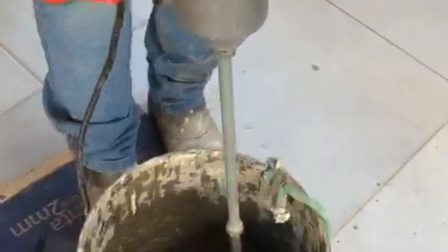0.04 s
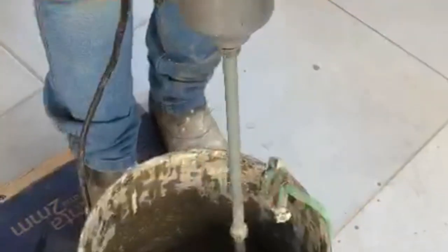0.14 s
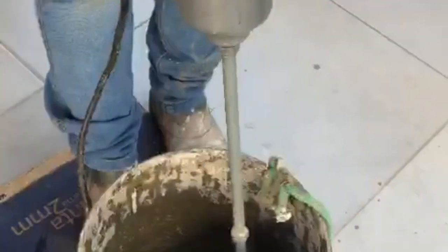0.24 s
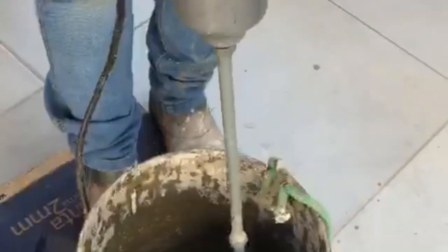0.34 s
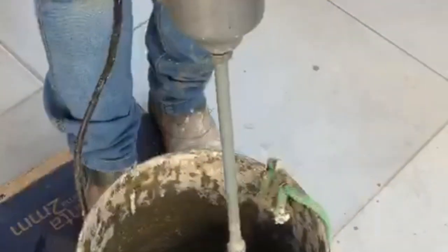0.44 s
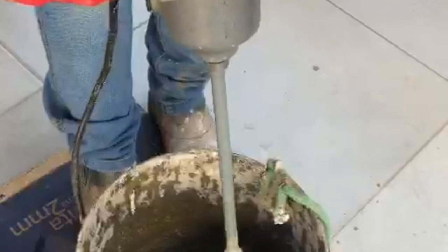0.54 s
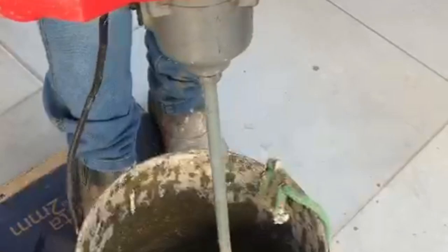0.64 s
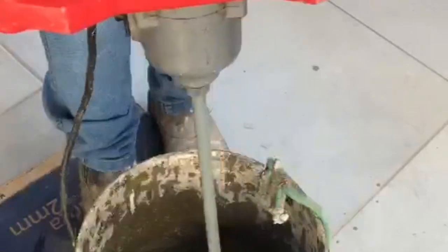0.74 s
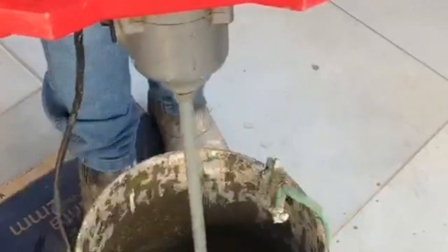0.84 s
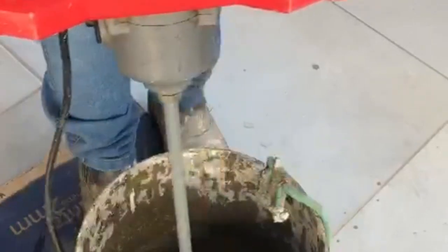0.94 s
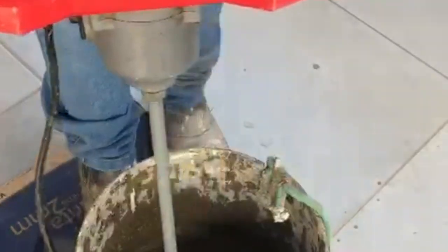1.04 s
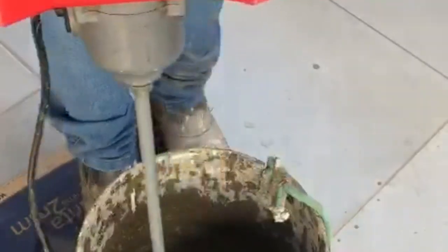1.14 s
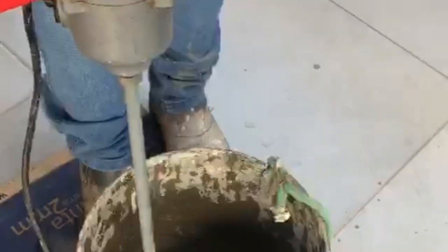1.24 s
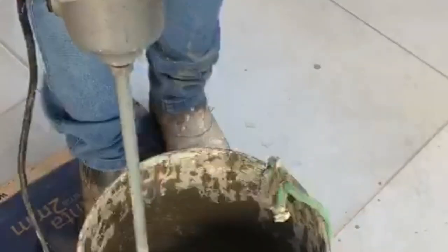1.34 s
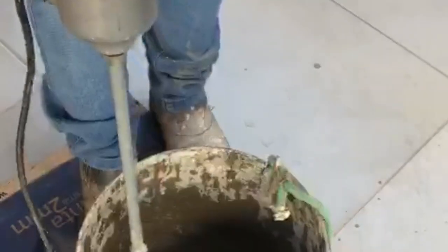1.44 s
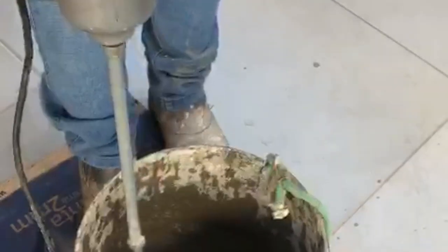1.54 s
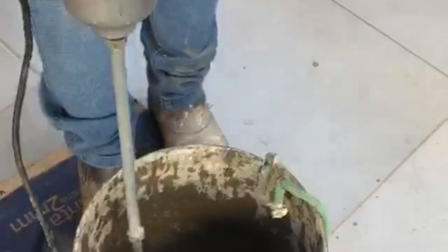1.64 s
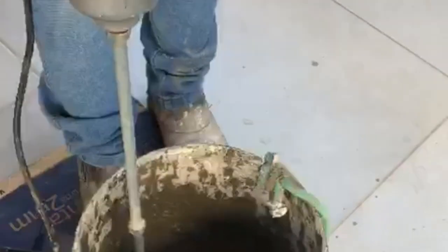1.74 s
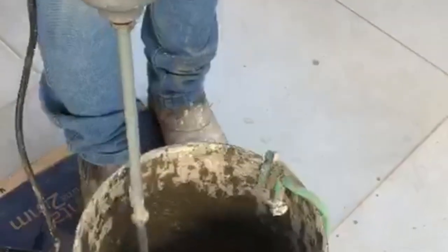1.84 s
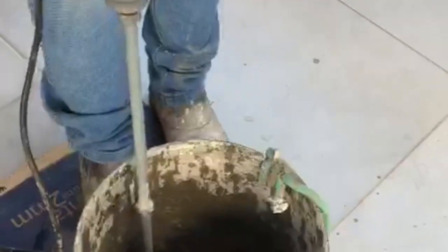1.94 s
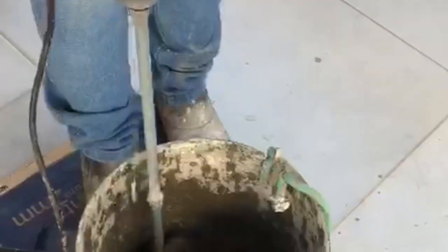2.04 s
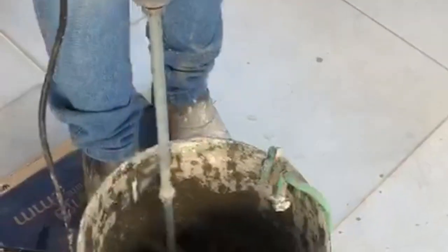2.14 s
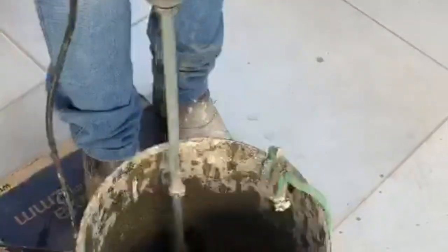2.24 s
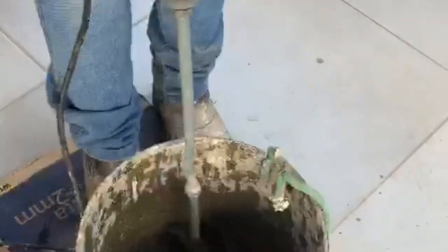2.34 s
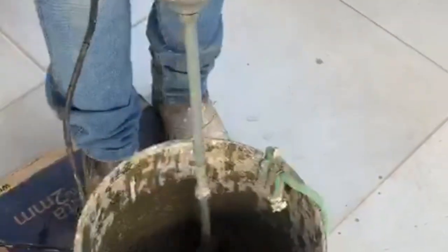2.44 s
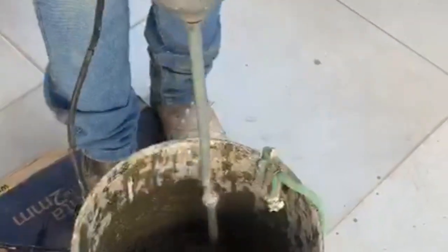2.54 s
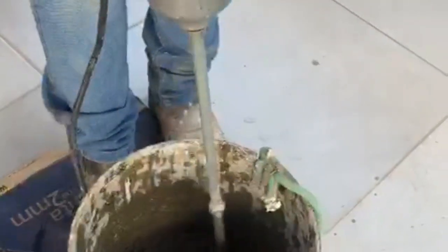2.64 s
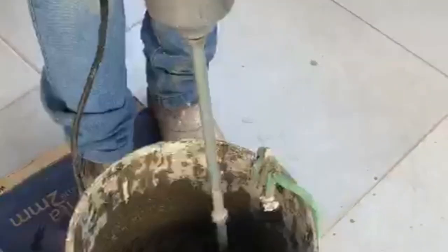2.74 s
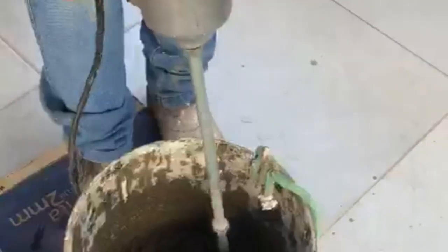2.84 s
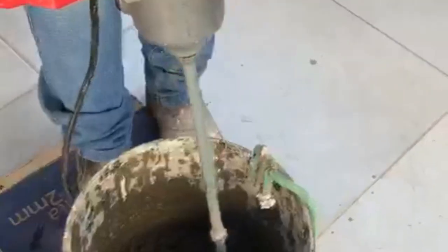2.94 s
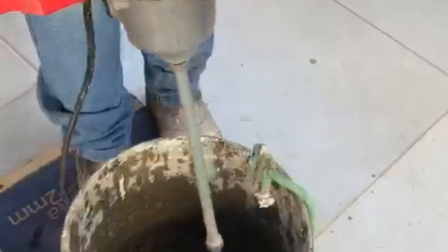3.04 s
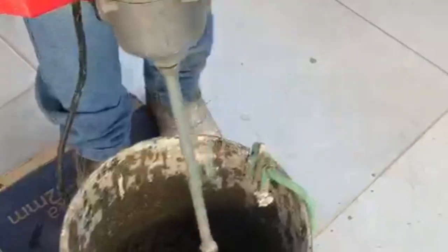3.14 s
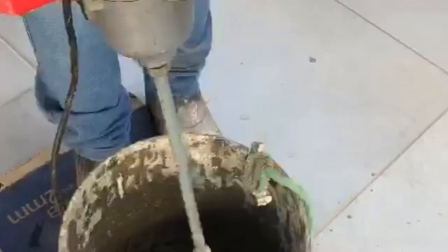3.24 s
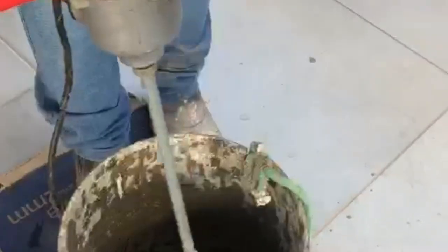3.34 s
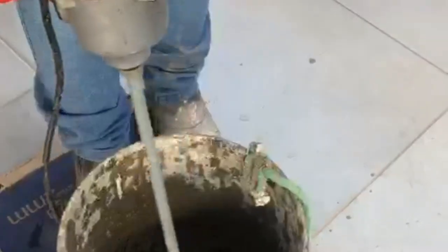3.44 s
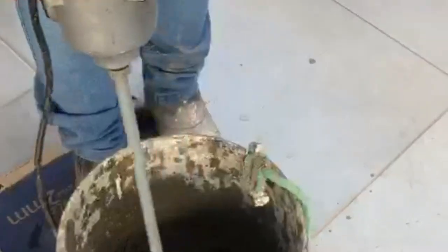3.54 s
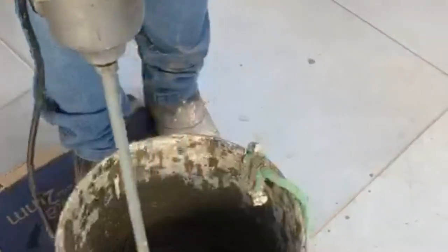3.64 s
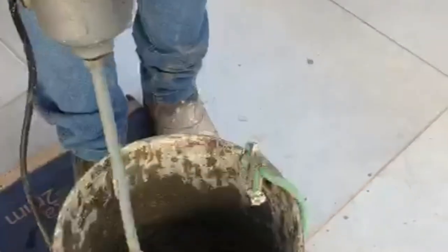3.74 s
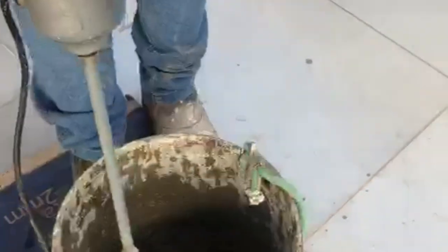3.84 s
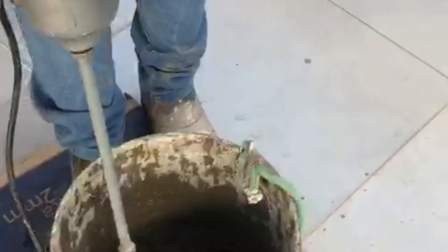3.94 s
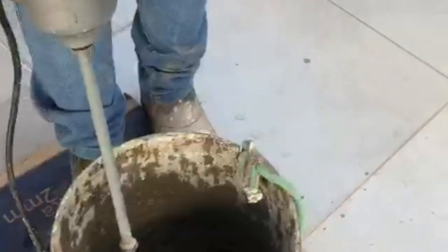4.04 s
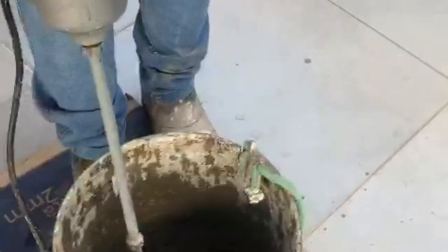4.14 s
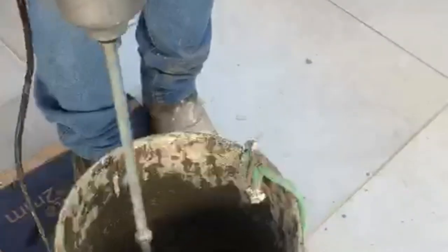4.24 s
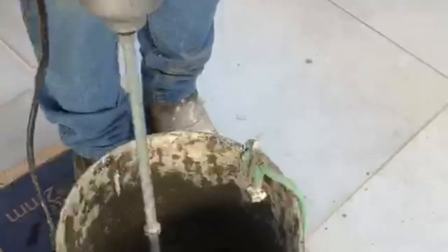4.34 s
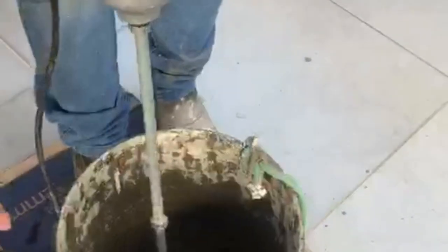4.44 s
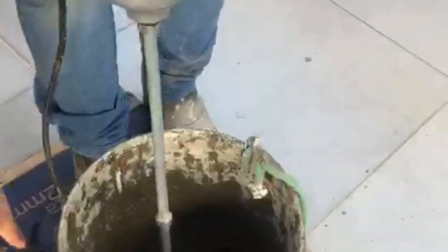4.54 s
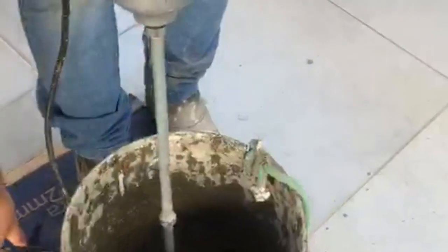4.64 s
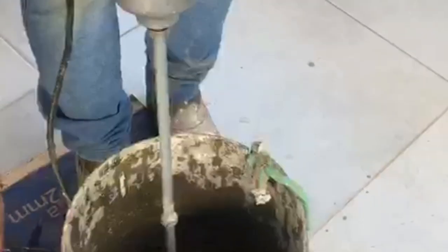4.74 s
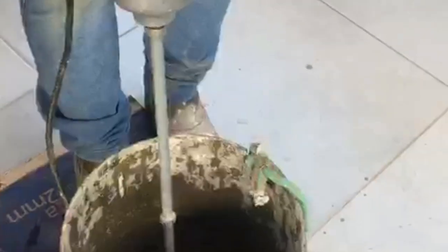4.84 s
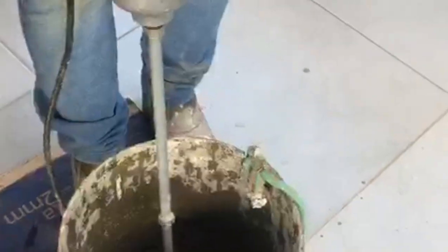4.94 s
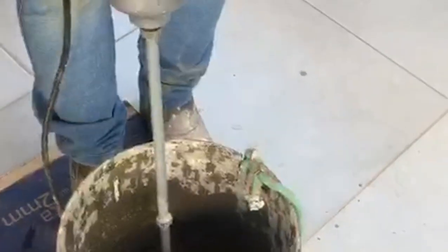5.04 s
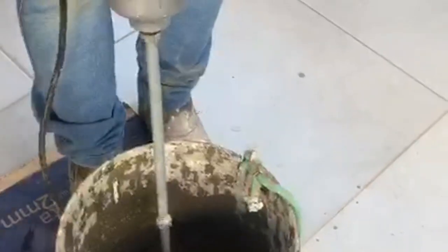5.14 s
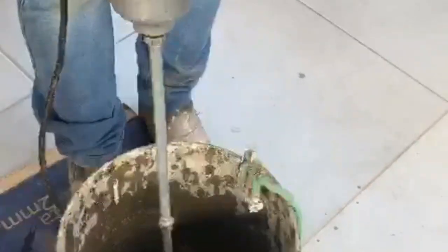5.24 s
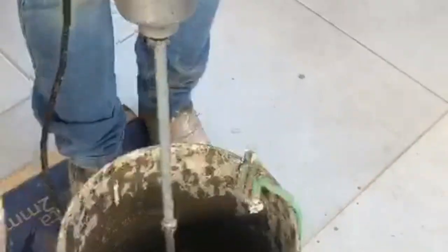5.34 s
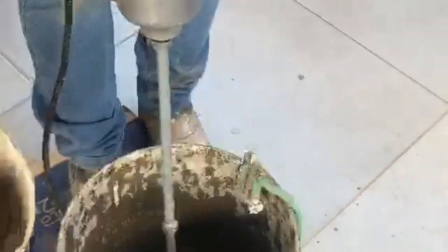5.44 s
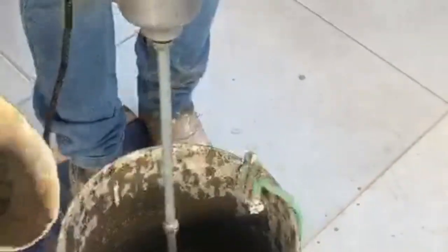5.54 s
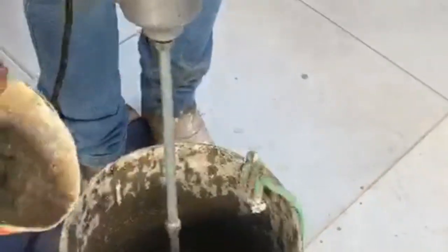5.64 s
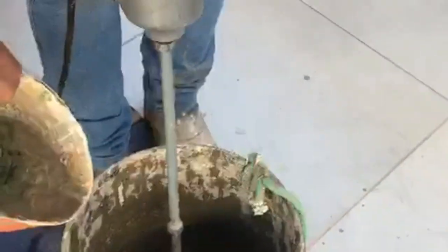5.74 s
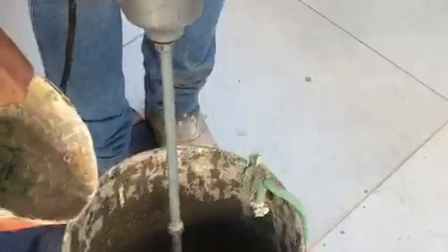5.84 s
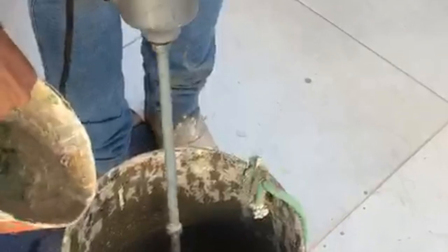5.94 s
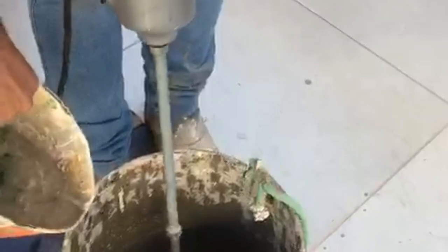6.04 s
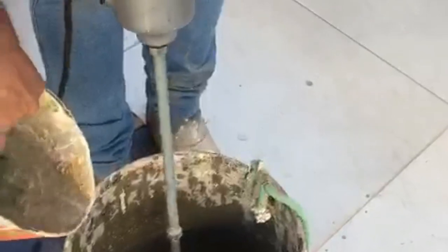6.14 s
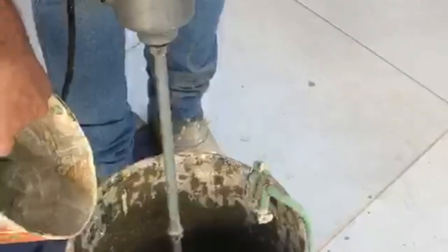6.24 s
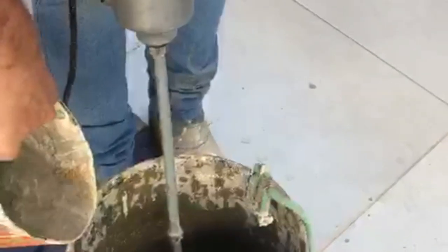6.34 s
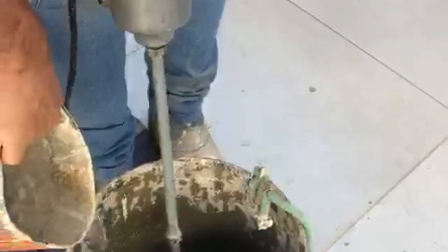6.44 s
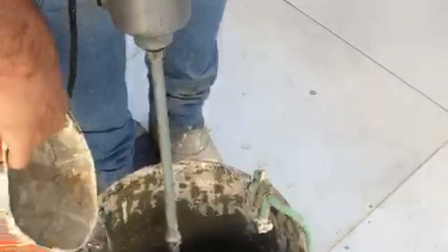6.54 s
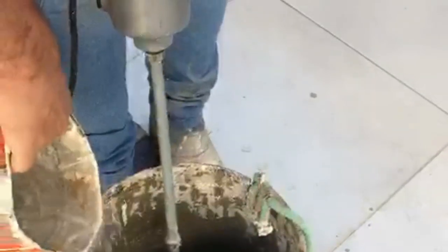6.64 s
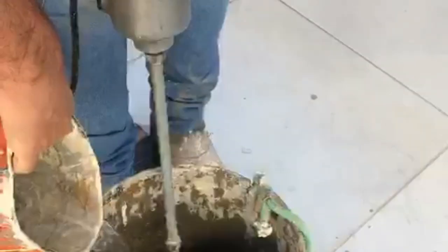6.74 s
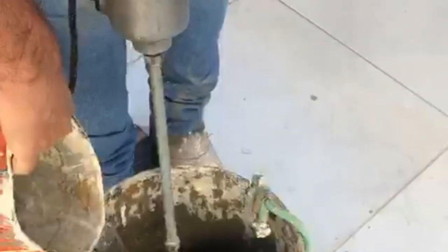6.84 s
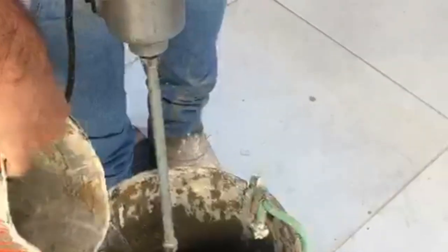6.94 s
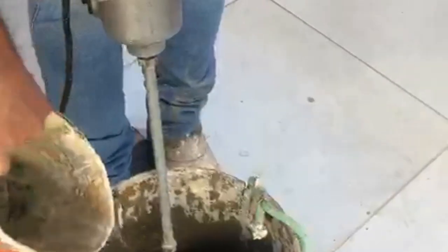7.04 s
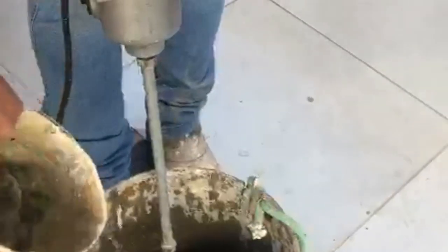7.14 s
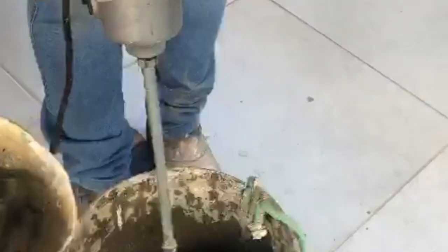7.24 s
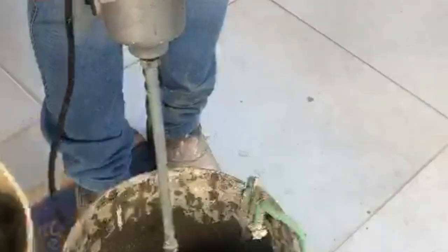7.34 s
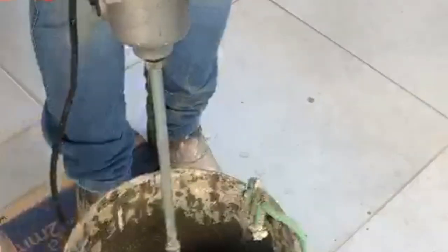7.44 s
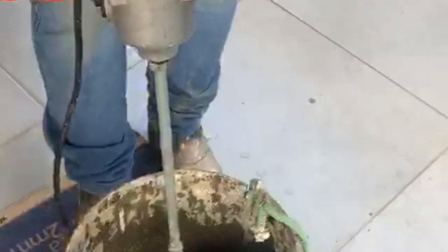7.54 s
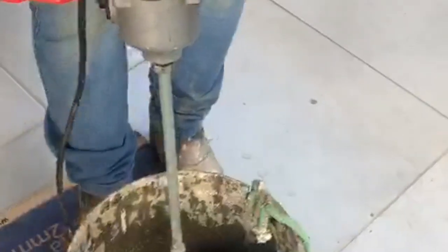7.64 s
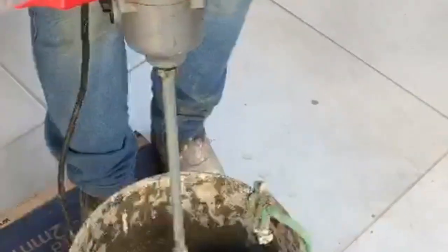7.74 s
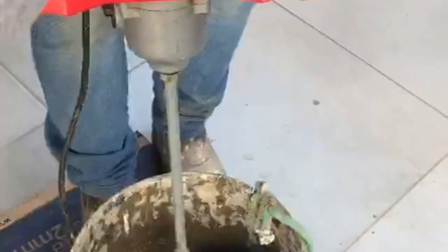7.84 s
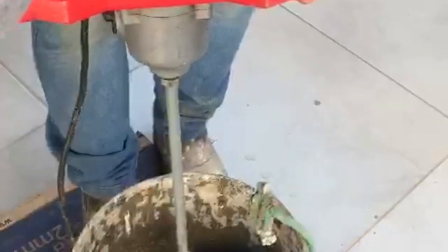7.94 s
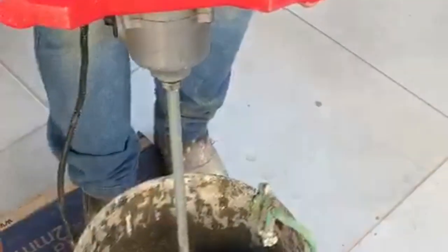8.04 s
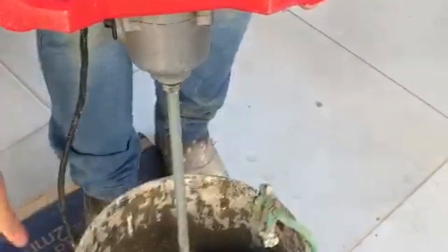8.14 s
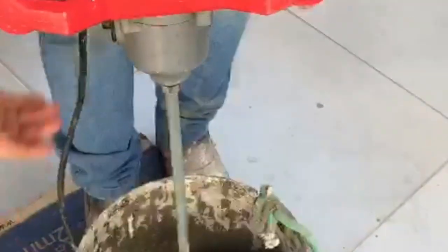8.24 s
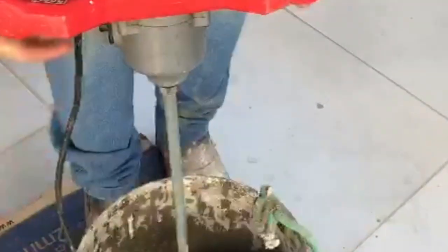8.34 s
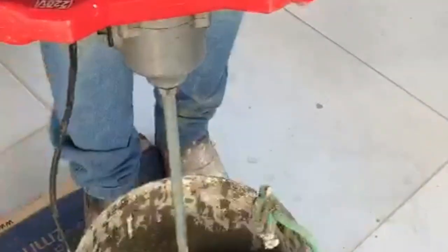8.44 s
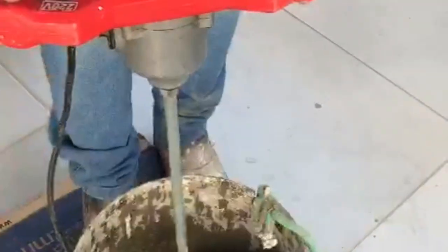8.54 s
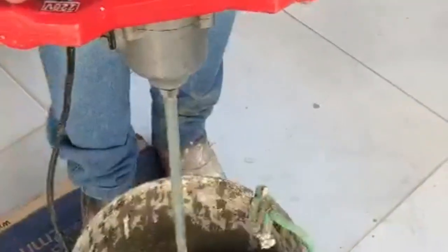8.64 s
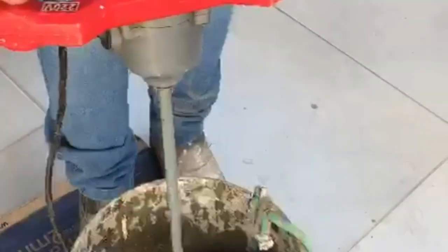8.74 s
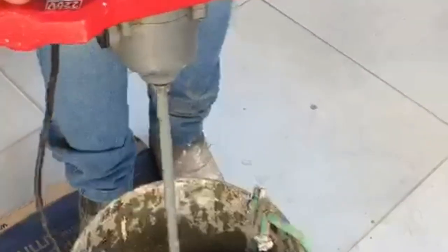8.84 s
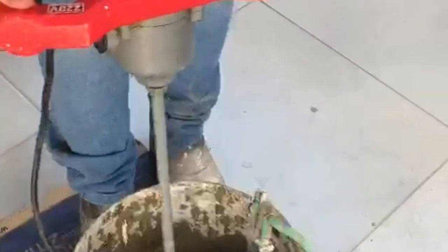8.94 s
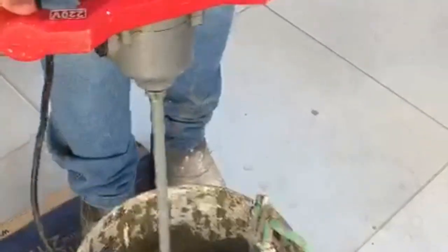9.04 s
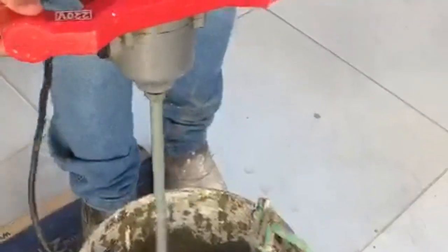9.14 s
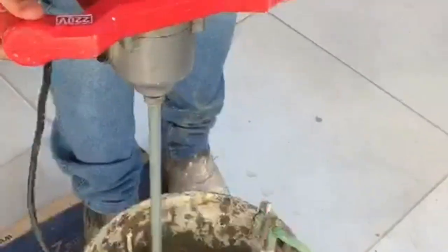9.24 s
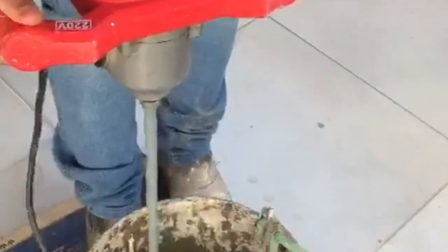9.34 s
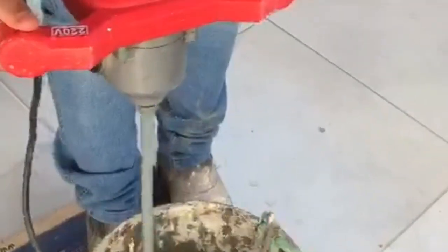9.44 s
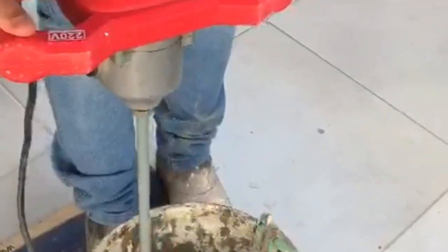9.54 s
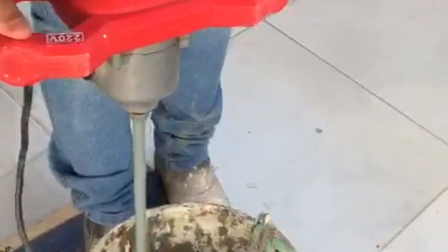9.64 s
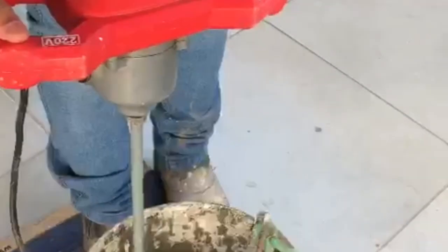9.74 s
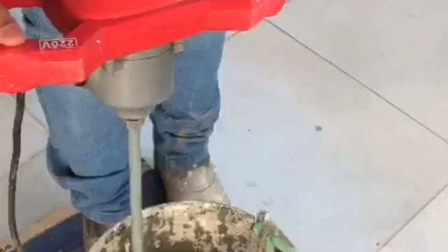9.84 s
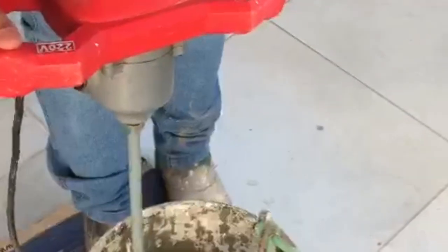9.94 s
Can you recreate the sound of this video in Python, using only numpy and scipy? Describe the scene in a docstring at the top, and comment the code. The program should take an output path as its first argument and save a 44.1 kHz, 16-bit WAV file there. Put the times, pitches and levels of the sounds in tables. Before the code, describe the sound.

Close up, an electric paddle mixer runs with a raspy whir and gear whine as it churns mortar. The motor cuts and the gears slow to a stop. Quiet trickling grit and small lumps drop into the bucket, followed by a light scraping knock from a pail and faint squeaks. Then a sharp click starts the mixer again, its whine rising quickly over a faint background rumble.

```python
"""Paddle mixer in a mortar bucket

A handheld electric mixer stirs mortar, coasts to a stop and is switched on again. One rotor speed
drives the gear whine, the motor's mains-pulsed growl and the rush of fan and gears.
In the pause grit is tipped in from a small pail, and the pail is set down."""
import sys
import numpy as np
from scipy import signal
from scipy.fft import rfft, irfft, next_fast_len
from scipy.io import wavfile
from scipy.ndimage import uniform_filter1d

SR = 44100
rng = np.random.default_rng(int(sys.argv[2]) if len(sys.argv) > 2 else 0)


def wav_out(sig):
    """Save sig, one row per channel (or a flat mono array), as 16-bit PCM at SR to the path in sys.argv[1]."""
    wavfile.write(sys.argv[1], SR, np.round(np.clip(np.atleast_2d(sig).T, -1, 1) * 32767).astype(np.int16))


N = 440559
TIME = np.arange(N) / SR
OFF_S, ON_S = 3.96, 8.722  # trigger released, pressed
LOOSEN_S = .8  # release to fully loose gears
MAINS_HZ, NO_LOAD_RPS, SLOT_COUNT = 60, 289, 12
RIPPLE_DB = 3.8

# bucket and motor housing resonances: f/Hz, width/Hz, lift/dB
HOUSING = [(420, 36, 7), (567, 66, -3), (880, 87, -2), (1095, 590, 5), (1642, 91, 8), (2024, 120, 5),
           (2446, 760, 6.5), (3500, 400, 3.5), (4400, 530, 5), (7040, 1060, 7.5), (10120, 820, 3.5)]
# gearbox casing resonances: f/Hz, width/Hz, lift/dB
CASING = [(1070, 220, 11), (1680, 150, 9.5), (1880, 410, 5.5), (2454, 230, 8.5), (3130, 170, 8),
          (3720, 330, 6.5), (4940, 90, -1), (7650, 420, 8), (10280, 470, 15)]


def amp(db):
    """dB to gain."""
    return 10 ** (np.asarray(db) / 20)


def unit(x):
    """Scale to rms 1."""
    return x / np.sqrt(np.mean(x ** 2) + 1e-20)


def curve(points):
    """(t/s, value) points to one value per sample."""
    return np.interp(TIME, *np.transpose(points))


def read(points, hz):
    """(f/Hz, value) points interpolated over log frequency."""
    f, value = np.transpose(points)
    return np.interp(np.log(hz + 1), np.log(f + 1), value)


def lift_db(resonances, hz):
    """Summed lift of resonance peaks at hz."""
    grid_hz = np.arange(0, 13000, 10)
    lift = sum(db / (1 + (2 * (grid_hz - f) / width) ** 2) for f, width, db in resonances)
    return np.interp(hz, grid_hz, lift)


def filtered(x, gain):
    """FFT filter by gain(f/Hz)."""
    size = next_fast_len(len(x))
    return irfft(rfft(x, size) * gain(np.fft.rfftfreq(size, 1 / SR)), size)[:len(x)]


def coloured(x, spectrum):
    """Shape by (f/Hz, level/dB) points; rms 1."""
    return unit(filtered(x, lambda f: amp(read(spectrum, f))))


def band(x, hz, octaves):
    """Band-pass, Gaussian over log frequency."""
    return filtered(x, lambda f: np.exp(-.5 * (np.log2((f + 1) / hz) / octaves) ** 2))


def drift(hz):
    """Random wander, rms 1, hz new values a second."""
    knots = rng.standard_normal(40000)
    return unit(np.interp(TIME * hz, np.arange(len(knots)), knots))


def swell(middle_s, length_s):
    """Soft-edged window, peak 1."""
    return np.exp(-(2 * (TIME - middle_s) / length_s) ** 4)


def add(mix, start_s, sound):
    """Mix a sound in, in place."""
    part = mix[round(start_s * SR):][:len(sound)]
    part += sound[:len(part)]


def burst(t60_s):
    """Decaying noise puff."""
    t = TIME[:SR // 4]
    return rng.standard_normal(len(t)) * amp(-60 * t / t60_s)


def impacts(rows, octaves):
    """Small impacts, each a puff around its own pitch."""
    out = np.zeros(N)
    for start_s, db, hz, t60_s in rows:
        puff = burst(t60_s)
        hit = band(puff, hz, octaves)
        add(out, start_s, amp(db) * hit * np.std(puff) / np.std(hit))
    return out


def rotor_rps(coast_s=2.1975, drag_rps=299, restart_rps=269.2):
    """Turns per second: loaded by mortar, braked by friction and fan drag, at rest, climbing again."""
    # stirring: t/s, speed/rps
    stir = [(0.0, 269.5), (0.51, 285.8), (0.73, 287.8), (1.45, 288.5), (2.25, 285.0), (3.12, 279.6),
            (3.34, 279.7), (3.96, 284.4)]
    # quick and slow part of the climb: share, time constant/s
    lags = [(.7325, .225), (.2675, .769)]
    left = np.clip(1 - (TIME - OFF_S) / coast_s, 0, 1)
    coast = drag_rps * np.tan(np.arctan(stir[-1][1] / drag_rps) * left)  # drag = friction at drag_rps
    on_s = np.maximum(TIME - ON_S, 0)
    climb = restart_rps * sum(share * (1 - np.exp(-on_s / lag_s)) for share, lag_s in lags)
    return np.where(TIME < OFF_S, curve(stir), coast + climb)


def halvings(rps):
    """Octaves below no-load speed."""
    return -np.log2(rps / NO_LOAD_RPS + 1e-9)


def current(rps):
    """Share of stall current: a slower rotor draws more."""
    return np.sqrt(np.maximum(1 - rps / NO_LOAD_RPS, 0))


def freewheel(release_s):
    """0 under power, ramping to 1 after trigger release."""
    return np.clip((TIME - OFF_S) / release_s, 0, 1) * (TIME < ON_S)


def tone(turns, order, waver_db, blur_rad):
    """One multiple of rotor speed; swells and smears as the tool sways."""
    sway = amp(waver_db * drift(14) - waver_db ** 2 / 10)
    phase = 2 * np.pi * (order * turns + rng.random()) + blur_rad * drift(40)
    return np.sqrt(2) * sway * np.cos(phase)


def ripple(hz, depth_db):
    """Gain through the casing's fine resonances, which break up a gliding tone."""
    modes = rng.standard_normal(400)
    return amp(depth_db * np.interp(hz / 80, np.arange(len(modes)), modes) - depth_db ** 2 / 14)


def reflected(x, delays_ms=(4.3, 9.1, 15.7, 23.3)):
    """Echoes off floor, legs and bucket make a gliding tone flicker."""
    echoes = sum(np.pad(x, (int(ms * SR / 1000), 0))[:N] for ms in delays_ms)
    return .92 * (x + .22 * echoes)


def room(x):
    """Diffuse tail; treble dies first."""
    # decay: f/Hz, t60/s
    decay = [(200, 0.98), (1500, 0.54), (5000, 0.21), (12000, 0.31)]
    hz, t, spectra = signal.stft(rng.standard_normal(SR) * (TIME[:SR] > .006), SR, nperseg=256)
    tail = signal.istft(spectra * amp(-60 * t / read(decay, hz)[:, None]), SR, nperseg=256)[1]
    return signal.fftconvolve(x, tail / np.linalg.norm(tail))[:N]


def background(level_db=-59.5):
    """Steady, bass-heavy noise."""
    # spectrum: f/Hz, level/dB
    spectrum = [(15, -22), (40, -3), (62, 0), (110, -8), (260, -11), (600, -21), (1100, -26), (4000, -29),
                (12000, -31)]
    return amp(level_db) * coloured(rng.standard_normal(N), spectrum)


def squeaks(jitter=.066):
    """Brief unsteady glides."""
    # t/s, length/s, first f/Hz, last f/Hz, level/dB
    glides = [(6.15, 0.35, 2800, 2840, -73), (6.523, 0.058, 6900, 4450, -56),
              (7.64, 0.0235, 1310, 1920, -47), (7.99, 0.061, 5840, 5240, -60)]
    out, unsteady = np.zeros(N), 1 + jitter * drift(900)
    for start_s, length_s, first_hz, last_hz, db in glides:
        n = int(length_s * SR)
        hz = np.linspace(first_hz, last_hz, n) * unsteady[int(start_s * SR):][:n]
        glide = np.sqrt(2) * np.sin(2 * np.pi * np.cumsum(hz) / SR)
        add(out, start_s, amp(db) * glide * signal.windows.tukey(n, .5))
    return out


def lumps():
    """Clods and crumbs land; lumps plop into wet mortar."""
    # dry landings: t/s, level/dB, f/Hz, t60/s
    clods = [(6.463, -44, 685, 0.027), (6.488, -48.5, 7000, 0.075), (6.72, -48.5, 8000, 0.026),
             (6.766, -50, 6000, .02), (7.208, -41, 3800, 0.012), (7.246, -46, 5000, 0.03),
             (7.344, -38.5, 5000, 0.038), (7.353, -38, 7000, 0.029), (7.635, -45.5, 4470, 0.044),
             (7.722, -48.5, 5470, 0.028)]
    # wet landings: t/s, level/dB, f/Hz, t60/s
    plops = [(6.858, -53, 3120, .05), (6.914, -55, 3120, .05), (6.942, -49.5, 2130, 0.046),
             (7.018, -51, 3950, .04), (7.176, -52, 2700, 0.055), (7.191, -43.5, 3670, .08),
             (7.219, -51, 2400, .05), (7.249, -49, 3900, .05), (7.348, -47, 2840, 0.046),
             (7.366, -50, 3400, 0.028), (7.398, -54, 2210, 0.04)]
    return impacts(clods, octaves=1.13) + impacts(plops, octaves=.22)


def pour(grains_per_pitch=1666, spread_db=2.5, decay_cycles=9.8):
    """Uneven grains land in clumps, each ringing briefly; a last few trickle after."""
    # flow from the pail: t/s, level/dB
    flow = [(6.4, -75), (6.68, -80), (6.78, -65), (6.97, -56.5), (7.14, -63), (7.19, -54.5), (7.28, -58),
            (7.39, -58), (7.45, -64), (7.55, -90)]
    # grit spectrum: f/Hz, level/dB
    spectrum = [(710, -42), (1200, -2), (1280, -13), (1780, -20), (3560, -13), (4670, -10.5), (10100, -9),
                (12000, -9), (15600, -41), (22000, -120)]
    t, grains = TIME[:SR // 50], np.zeros(N)
    for hz in np.geomspace(1600, 11000, 24):
        sizes = amp(spread_db * np.minimum(rng.exponential(1, grains_per_pitch), 4))
        landings = np.zeros(N)
        landings[rng.integers(0, N, grains_per_pitch)] = sizes
        ring = hz * np.sin(2 * np.pi * hz * t) * np.exp(-t * hz / decay_cycles)
        grains += signal.oaconvolve(landings, ring)[:N]
    clumps = amp(2 * drift(110))
    trickle = amp(-64.5) * swell(middle_s=8.46, length_s=.063)
    return (amp(curve(flow)) + trickle) * clumps * coloured(grains, spectrum)


def pail(ring_db=-8):
    """Gritty knocks ring the hollow pail as it is set down."""
    # t/s, level/dB, t60/s
    knocks = [(7.842, -50, 0.06), (7.862, -41.5, 0.08), (7.872, -46, 0.059), (7.879, -38, 0.1),
              (7.9, -44.5, 0.056), (8.021, -55.5, 0.3), (8.076, -50.5, 0.11), (8.094, -46, 0.045)]
    # pail modes: f/Hz, level/dB, t60/s
    modes = [(373, -3, 0.35), (475, -2, 0.25), (1300, -8, 0.25), (1730, -13, .2), (1895, -6, 0.18)]
    # scrape spectrum: f/Hz, level/dB
    scrape = [(71, -45), (120, -24), (367, -4), (778, -12), (1310, -6), (1470, -11), (1960, -5), (2240, -9),
              (11300, -15), (12000, -25), (15600, -51), (22000, -120)]
    t, blows = TIME[:SR], np.zeros(N)
    for start_s, db, t60_s in knocks:
        add(blows, start_s, amp(db) * burst(t60_s))
    response = sum(amp(db - 60 * t / t60_s) * np.sin(2 * np.pi * hz * t) for hz, db, t60_s in modes)
    ring = unit(signal.fftconvolve(blows, response)[:N])
    return np.std(blows) * (coloured(blows, scrape) + amp(ring_db) * ring)


def switch_on():
    """Trigger click, motor jolt, gear teeth taking up slack."""
    # t/s, level/dB, f/Hz, t60/s
    hits = [(8.718, -33, 7100, 0.058), (8.722, -45, 406, 0.62), (8.726, -31.5, 2090, 0.1),
            (8.743, -27, 2030, 0.058)]
    return impacts(hits, octaves=.58)


def churn(level_db=-64.5, fall_db_oct=3.5):
    """Paddle rumbling through mortar, louder as it rubs the bucket wall."""
    rumble = unit(band(rng.standard_normal(N), hz=97, octaves=.96))
    wall_db = 11 * swell(middle_s=2.25, length_s=.58)
    return amp(level_db - fall_db_oct * halvings(rotor_rps()) + wall_db + .5 * drift(25)) * rumble


def hum(turns, rps, fall_db_oct=15):
    """Rotor unbalance, twice a turn."""
    # t/s, level/dB
    levels = [(0, -60), (.22, -42), (.35, -50), (2.2, -52.5), (2.5, -43.5), (3.3, -55), (3.9, -39),
              (4.1, -48)]
    return amp(curve(levels) - fall_db_oct * halvings(rps)) * tone(turns, 2, waver_db=.5, blur_rad=.23)


def slot_wind(turns, rps, rush_db):
    """Rotor slots chop air like a faint siren, clearest when coasting."""
    # slot harmonic, driven level/dB, coasting level/dB (relative; follow the rush)
    harmonics = [(1, -30, -10), (2, -24, -11), (3, -17, -7), (4, -30, -10), (5, -30, -14)]
    free, out = freewheel(LOOSEN_S), np.zeros(N)
    for k, driven_db, coast_db in harmonics:
        hz = k * SLOT_COUNT * rps
        db = driven_db + free * (coast_db - driven_db) + .4 * lift_db(CASING, hz)
        radiated = ripple(hz, RIPPLE_DB) / (1 + (1500 / (hz + 1)) ** 8)
        out += amp(db) * radiated * tone(turns, k * SLOT_COUNT, waver_db=2, blur_rad=.7)
    return amp(rush_db - 2) * out


def stator_rasp(turns, rps, powered, mains, levels_db=(-43, -41, -43, -48), fall_db_oct=7, cut_hz=2300):
    """Heavy current drives upper slot harmonics; the stator is too small to radiate low ones."""
    rasp = np.zeros(N)
    for k, db in enumerate(levels_db, 2):
        hz = k * SLOT_COUNT * rps
        radiated = amp(.7 * lift_db(HOUSING, hz)) * hz ** 6 / (hz ** 6 + cut_hz ** 6)
        rasp += amp(db) * radiated * tone(turns, k * SLOT_COUNT, waver_db=3, blur_rad=1.4)
    drive = current(rps) * powered * mains * (1 + .53 * drift(500))
    return amp(-fall_db_oct * halvings(rps)) * drive * rasp


def growl(turns, rps, powered, force_db=-42.5, fall_db_oct=11.5, stall_lift_db=14.5):
    """Rotor slots strike the stator in two bursts per mains cycle; current sharpens the bursts."""
    # slot harmonics: level/dB
    slots_db = [0, -46, -28]
    # swell while stirring: t/s, level/dB
    swells = [(0.1, 0), (.35, -2), (.8, 5.5), (1.15, -9), (1.5, 4.5), (2.0, -2), (2.4, 1.5), (3.6, -4.5),
              (4.2, -2)]
    # stator resonances: f/Hz, width/Hz, lift/dB
    stator = [(1800, 140, 22), (2480, 520, 13.5), (2766, 540, 9)]
    load = current(rps)
    pull = sum(amp(db) * tone(turns, k * SLOT_COUNT, waver_db=1, blur_rad=.4)
               for k, db in enumerate(slots_db, 1))
    pull *= 1 + .2 * np.cos(2 * np.pi * turns) + .25 * drift(500)
    sparks = unit(filtered(rng.standard_normal(N), lambda f: 1 / (1 + ((f - 2300) / 1100) ** 4)))
    snap = np.clip(.6 + 3.4 * load, 0, 3)
    bursts = np.exp(snap * np.cos(2 * np.pi * 2 * MAINS_HZ * TIME)) / np.sqrt(np.i0(2 * snap))  # rms 1
    db = force_db + curve(swells) - fall_db_oct * halvings(rps) + stall_lift_db * load
    force = amp(db) * powered * bursts * (unit(pull) + .4 * load * sparks)
    return filtered(force, lambda f: amp(lift_db(stator, f)))


def gears(turns, rps, rush_db, pinion_teeth=5, second_order=1.4):
    """Weaker mesh tones flare as they cross resonances; the small gearbox radiates little bass."""
    # mesh harmonic, driven level/dB, coasting level/dB (relative; follow the rush)
    pinion = [(1, -12, 2), (5, -12, -10), (6, -18, -10), (7, -17, -9), (9, -30, -11), (12, -35, -11),
              (16, -45, -13)]
    # second-stage harmonics: level/dB re rush
    second_db = [-14.5, -15, -14.5, -20, -16.5]
    free, out = freewheel(release_s=.88), np.zeros(N)
    for k, driven_db, coast_db in pinion:
        hz = k * pinion_teeth * rps
        db = (1 - free) * (driven_db - 5) + free * (coast_db - 5.5)
        db += .86 * lift_db(HOUSING, hz) + .51 * lift_db(CASING, hz)
        radiated = 1 / (1 + (820 / (hz + 1)) ** 8 + (hz / 11000) ** 8)
        out += amp(db) * radiated * tone(turns, k * pinion_teeth, waver_db=3, blur_rad=.3)
    for k, db in enumerate(second_db, 1):
        out += amp(db) * (rps / rps.max()) ** 2 * tone(turns, k * second_order, waver_db=3.5, blur_rad=.71)
    return amp(rush_db) * out


def whine(turns, rps, powered, mains, buzz=.11, uneven=.21):
    """Pinion and brushes sing through casing resonances; loose teeth roughen the coasting whine."""
    # two pinion whines, two commutator whines: cycles per turn
    orders = [10, 15, 20, 40]
    # per whine: restart level/dB, coasting level/dB, driven fall/(dB/oct), coasting fall/(dB/oct)
    laws = [(-41, -43.5, 9, 6.5), (-43, -37, 8, 13.5), (-33, -38, 19, 14), (-37, -40, 26, 18)]
    # each whine while stirring: t/s, level/dB
    pinion_low = [(0.25, -37.5), (.5, -48), (1.1, -40.5), (1.55, -53), (1.9, -45), (2.3, -51), (2.6, -39),
                  (3.1, -43), (3.9, -35)]
    pinion_high = [(0.1, -42), (.35, -52), (.7, -46), (.9, -35), (1.7, -42), (2.9, -48), (3.5, -41),
                   (3.96, -39)]
    brush_low = [(0.0, -33.5), (0.65, -38), (0.8, -33), (1.6, -32.5), (1.96, -36), (2.39, -38), (2.47, -32),
                 (3.19, -38), (3.48, -33.5), (3.96, -35)]
    brush_high = [(0.0, -35.5), (0.29, -28), (0.36, -38), (1.45, -30.5), (1.74, -46), (1.96, -39.5),
                  (3.05, -47), (3.27, -31.5), (3.96, -49)]
    free, slow, song = freewheel(release_s=.19), halvings(rps), np.zeros(N)
    for order, stirring, law in zip(orders, (pinion_low, pinion_high, brush_low, brush_high), laws):
        restart_db, coast_db, fall, coast_fall = law
        hz = order * rps
        driven_db = np.where(TIME < ON_S, curve(stirring), restart_db) - fall * slow
        db = (1 - free) * driven_db + free * (coast_db - coast_fall * slow) + lift_db(CASING, hz)
        loose = free * order / orders[-1]
        radiated = ripple(hz, RIPPLE_DB * loose) / (1 + (820 / (hz + 1)) ** 6)
        song += amp(db) * radiated * tone(turns, order, waver_db=1.5, blur_rad=.22 + .9 * loose)
    return song * (1 + buzz * powered * (mains - 1)) * (1 + uneven * np.cos(2 * np.pi * turns))


def rattle(turns, rps):
    """Teeth and bearings rasp almost alike on every turn, mixed with air noise."""
    rasp = np.zeros(N)
    for _ in range(4):
        partials = np.r_[np.zeros(6), np.exp(2j * np.pi * rng.random(91))]  # orders 6 to 96
        one_turn = unit(irfft(partials, 2048))
        rasp += one_turn[(turns % 1 * len(one_turn)).astype(int)] * drift(6)
    density = np.sqrt(96 * rps / (SR / 2))  # holds level per Hz as partials crowd
    share = .17 + .28 * freewheel(LOOSEN_S)
    return np.sqrt(share) * density * unit(rasp) + np.sqrt(1 - share) * rng.standard_normal(N)


def rush_levels_db(rps):
    """Low, middle and high band of the rush, each falling with speed."""
    # per band: driven level/dB, its fall/(dB/oct), coasting level/dB, its fall/(dB/oct)
    laws = [(-35, 8.4, -34.5, 8.1), (-33, 6.9, -37, 5.7), (-37, 9.7, -33, 9.4)]
    # high-band offset while stirring: t/s, level/dB
    treble = [(0, 0.5), (.5, 0), (.77, 2.5), (1.27, -0.5), (1.8, 1.5), (2.25, -1.5), (2.57, 2.5),
              (3.68, 4.5), (3.96, 0.5)]
    slow, free = halvings(rps), freewheel(release_s=.5)
    low, middle, high = [(1 - free) * (db - fall * slow) + free * (coast_db - coast_fall * slow)
                         for db, fall, coast_db, coast_fall in laws]
    return low, middle, high + curve(treble)


def rush(turns, rps, powered, mains, levels_db, flutter=.047, buzz=.0095):
    """Fan air and tooth rattle, throbbing per turn and mains half-wave, coloured by the housing."""
    # driven spectrum: f/Hz, level/dB
    driven_colour = [(59, -62), (100, -32), (270, -8.5), (333, -6.5), (398, -3.5), (517, -7), (571, -2),
                     (1180, -2), (1830, -3.5), (2840, -1.5), (4320, -1), (5170, -4), (5720, -1),
                     (7880, -6.5), (11300, -3), (12000, -17), (15600, -31), (22000, -120)]
    # coasting spectrum: f/Hz, level/dB
    coast_colour = [(88, -61.5), (150, -37), (324, -9.5), (430, -19), (560, -11.5), (662, -15.5),
                    (767, -18), (1150, -13.5), (1430, -18.5), (1660, -2.5), (2300, -10), (2570, -2),
                    (5160, -6.5), (7310, -1), (12000, -2), (15600, -67), (22000, -120)]
    throb = (1 + flutter * np.cos(2 * np.pi * turns)) * (1 + buzz * powered * (mains - 1))
    drive = unit(rattle(turns, rps) * throb * amp(.97 * drift(900)))
    slack = np.interp(TIME, [4.1, 5.2, 8.8, 9.15], [0, 1, 1, 0])  # slow gears rattle loosely
    below = lambda f, edge_hz: 1 / (1 + (f / edge_hz) ** 6)
    bands = [lambda f: below(f, 1500),
             lambda f: below(f, 5600) - below(f, 1500),
             lambda f: 1 - below(f, 5600)]
    cores_hz = [(200, 1400), (3300, 5400), (5900, 9500)]  # spans that levels_db refers to
    out = np.zeros(N)
    for colour, ring, weight in ((driven_colour, .57, 1 - slack), (coast_colour, .8, slack)):
        noise = filtered(drive, lambda f: amp(read(colour, f) + ring * lift_db(HOUSING, f)))
        hz, power = signal.welch(noise, SR, nperseg=2048, noverlap=0)
        for db, gain, (low_hz, high_hz) in zip(levels_db, bands, cores_hz):
            core_rms = np.sqrt(power[(hz > low_hz) & (hz < high_hz)].sum() * hz[1])
            out += weight * amp(db) * filtered(noise, gain) / core_rms
    return out


def scene(wet_db=-6.5, squeak_wet_db=-4.5):
    """Mixer, small sounds of the pause and background; mono on two channels."""
    rps = rotor_rps() * (1 + .0004 * drift(16))  # lumps tug at the paddle
    turns = np.cumsum(rps) / SR
    powered = uniform_filter1d(((TIME < OFF_S) | (TIME > ON_S)) * 1., 200)
    mains = 1 + .8 * np.cos(2 * np.pi * 2 * MAINS_HZ * TIME)
    bands_db = rush_levels_db(rps)
    rush_db = bands_db[1]
    mixer = rush(turns, rps, powered, mains, bands_db) + hum(turns, rps)
    tones = whine(turns, rps, powered, mains) + gears(turns, rps, rush_db)
    tones += stator_rasp(turns, rps, powered, mains)
    mixer += reflected(tones) + growl(turns, rps, powered) + slot_wind(turns, rps, rush_db) + churn()
    small = lumps() + switch_on() + pour() + pail()
    squeak = squeaks()
    reverb = room(amp(wet_db) * small + amp(squeak_wet_db) * squeak)
    mono = background() + reverb + squeak + small + mixer
    return np.array([mono, mono])


def record(dry):
    """Steep low-pass at 12 kHz."""
    taps = signal.firwin(401, 12000, window=("kaiser", 9), fs=SR)
    return signal.oaconvolve(dry, taps[None], "same")


dry = scene()
out = record(dry)
wav_out(out)
```